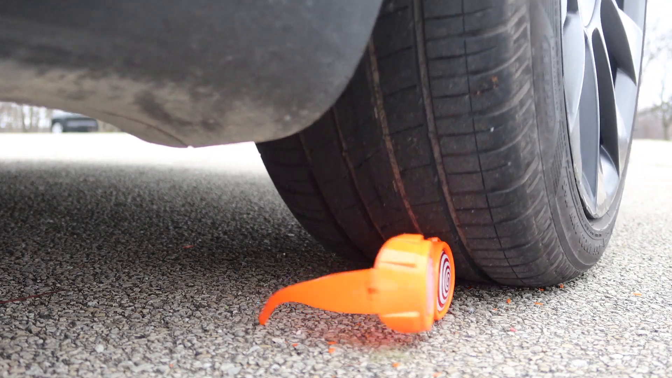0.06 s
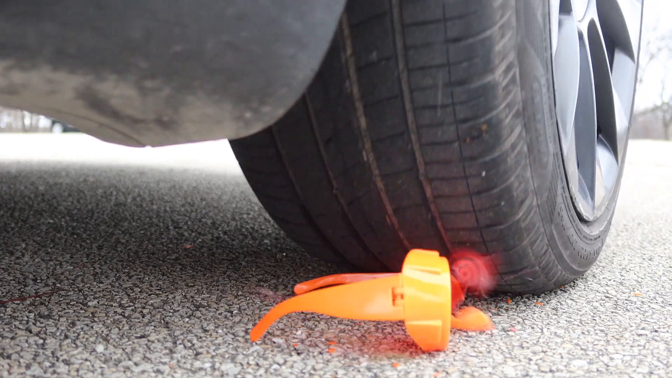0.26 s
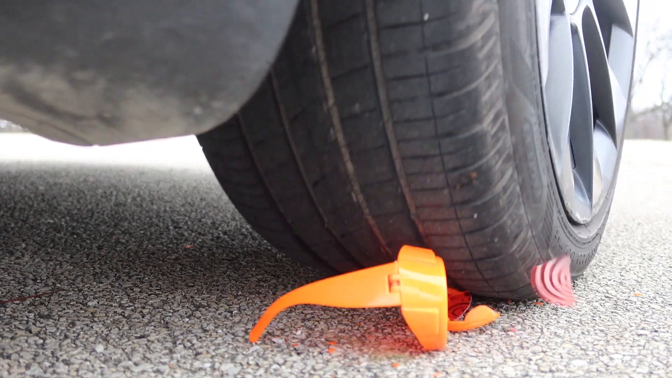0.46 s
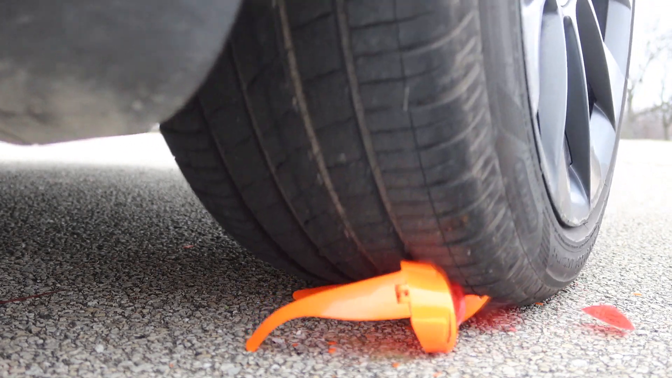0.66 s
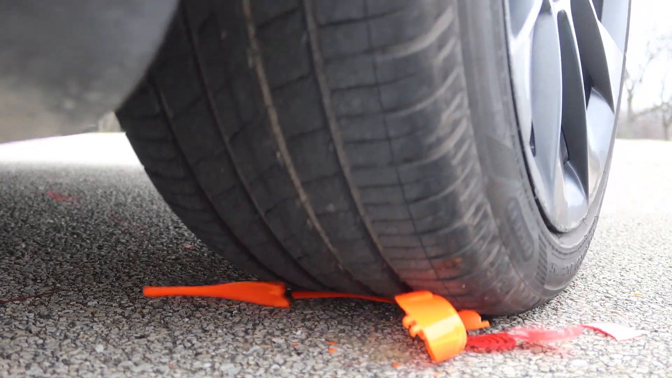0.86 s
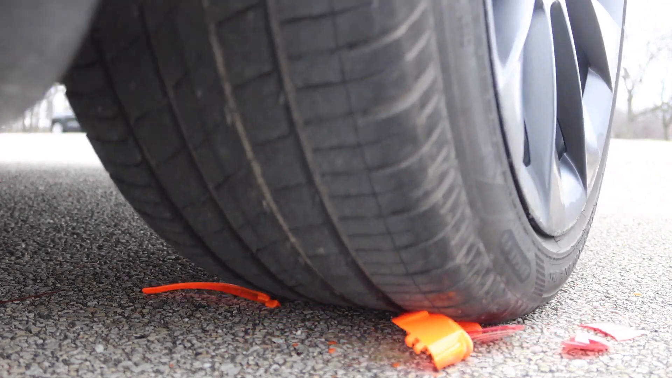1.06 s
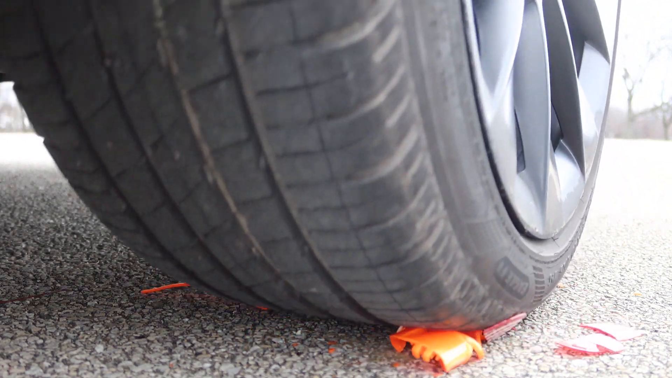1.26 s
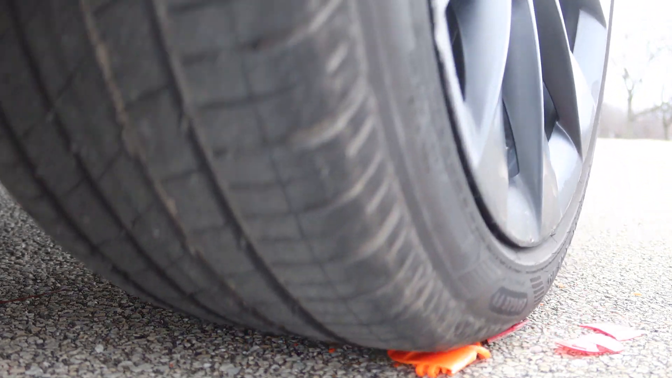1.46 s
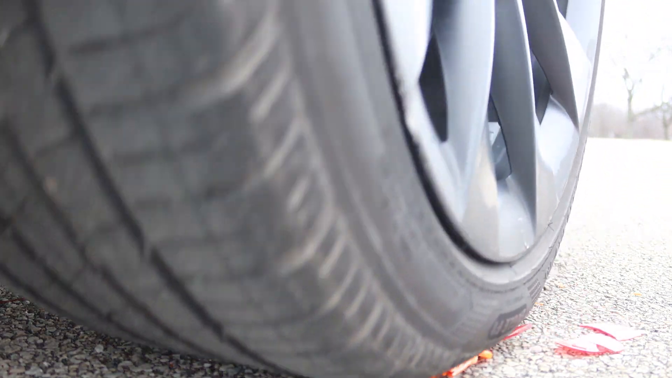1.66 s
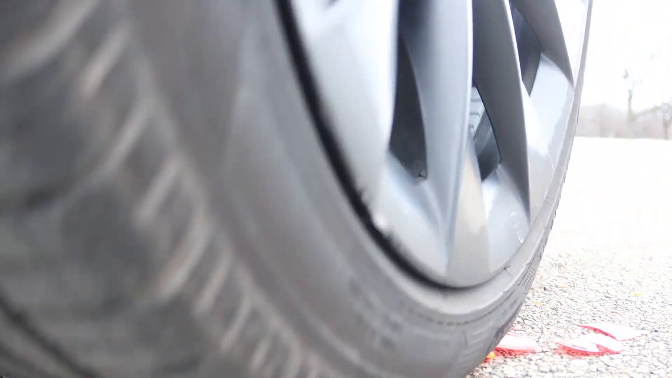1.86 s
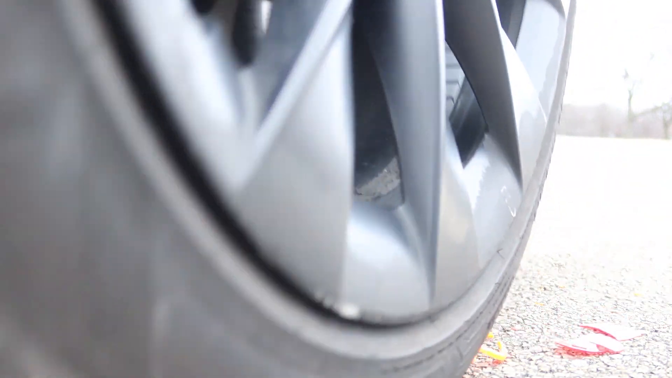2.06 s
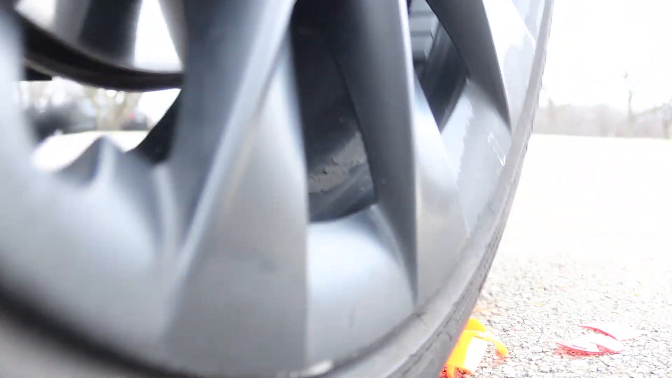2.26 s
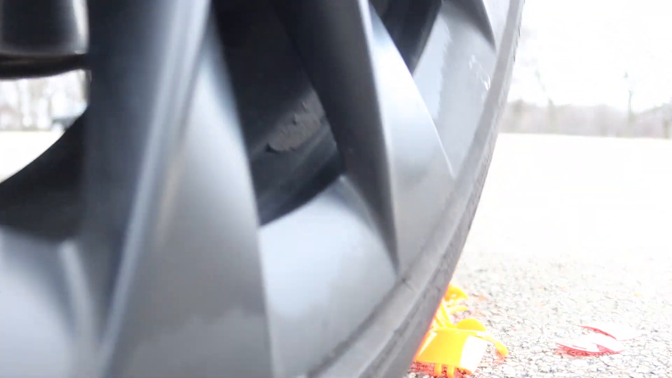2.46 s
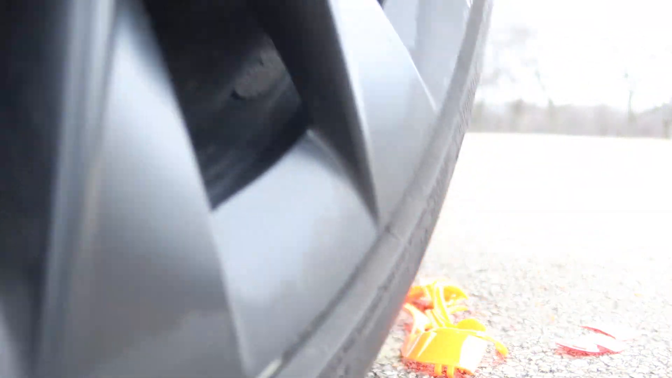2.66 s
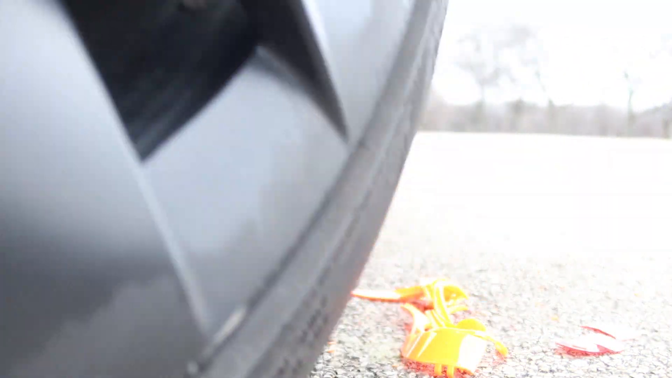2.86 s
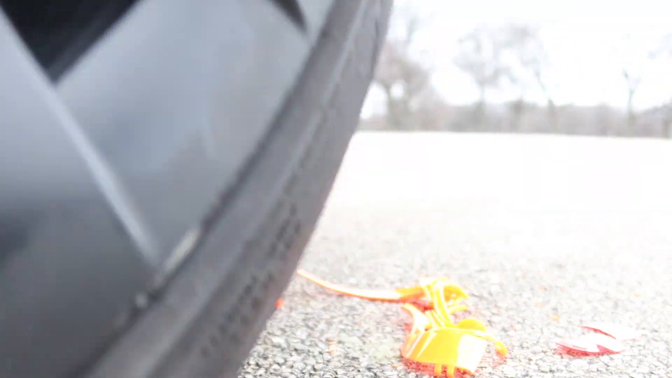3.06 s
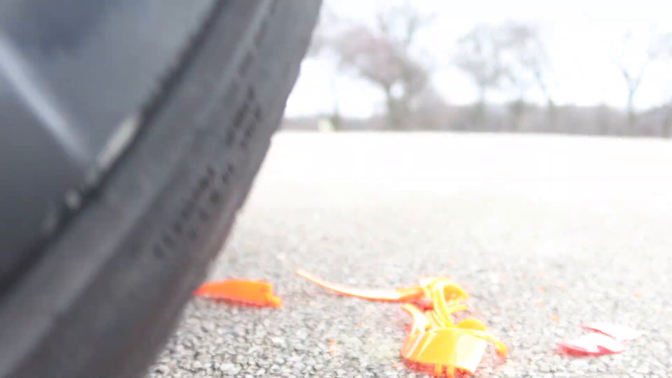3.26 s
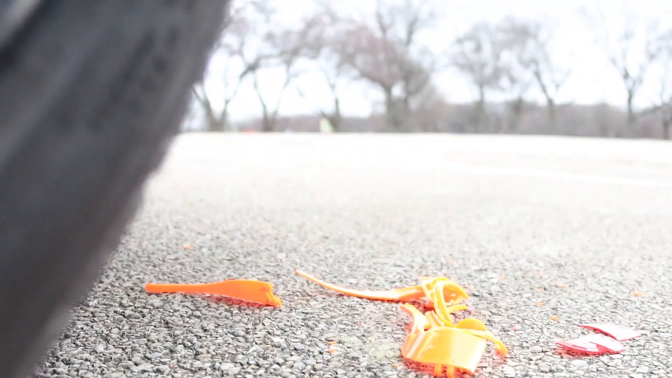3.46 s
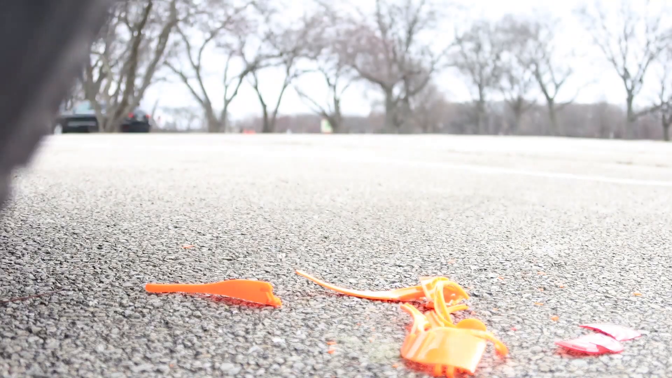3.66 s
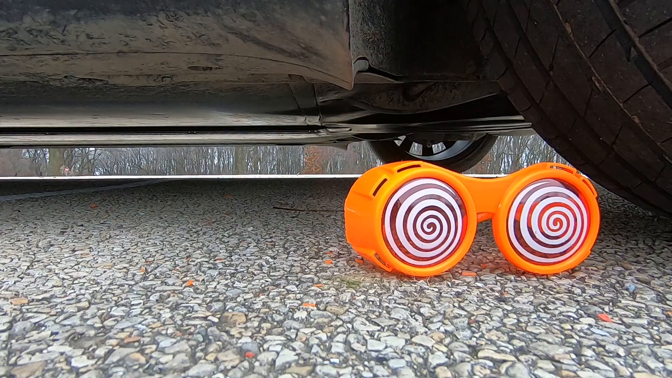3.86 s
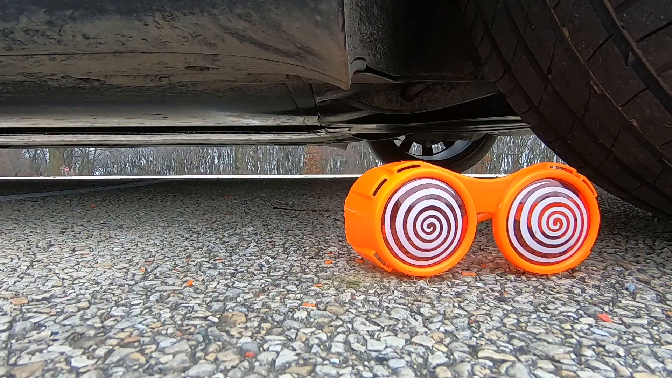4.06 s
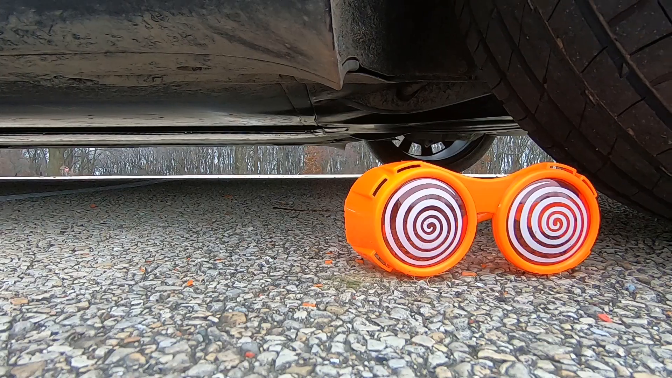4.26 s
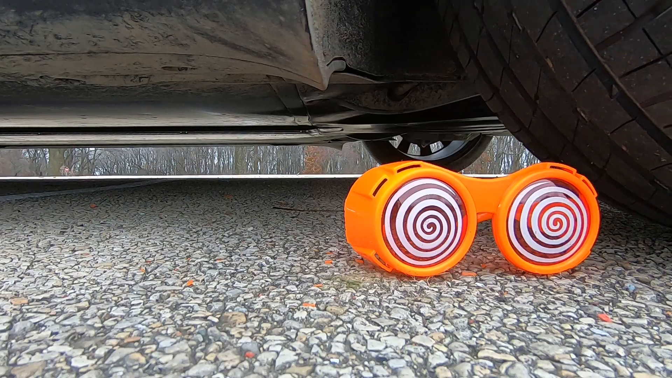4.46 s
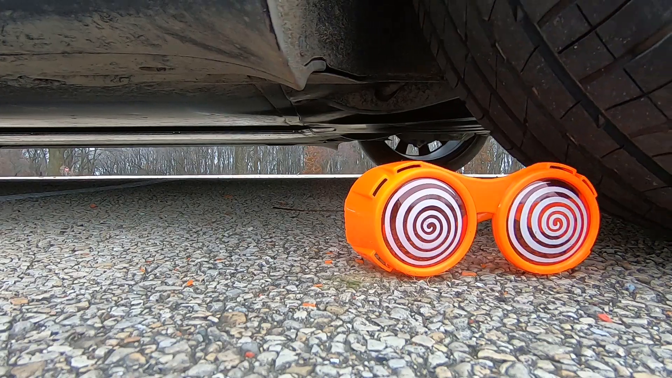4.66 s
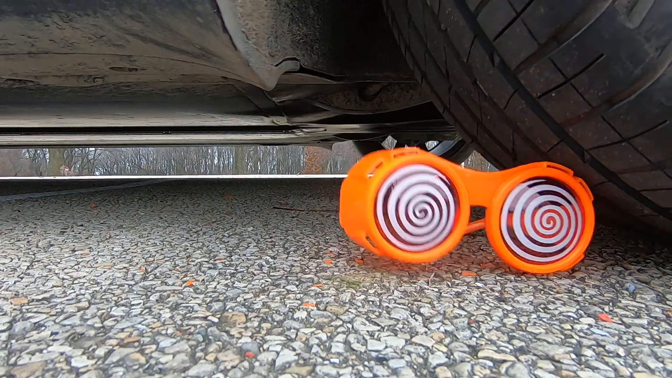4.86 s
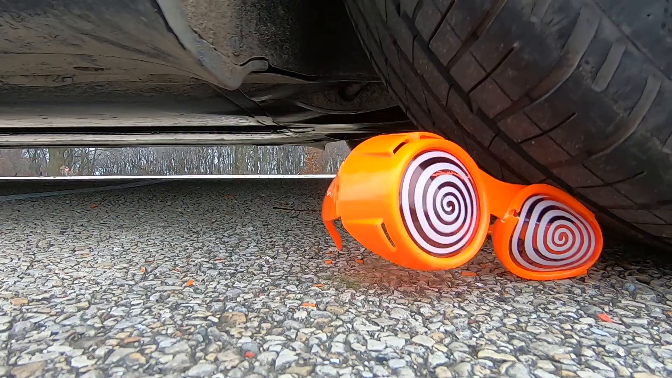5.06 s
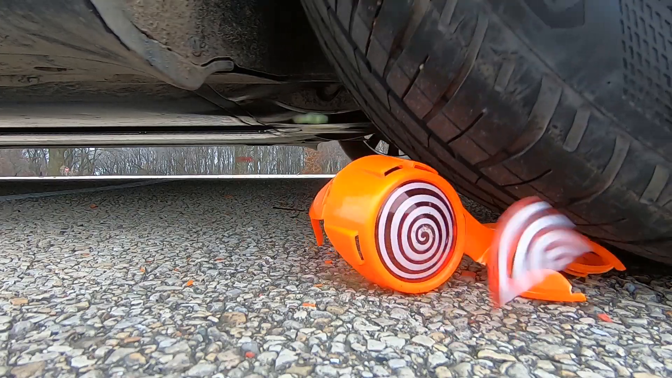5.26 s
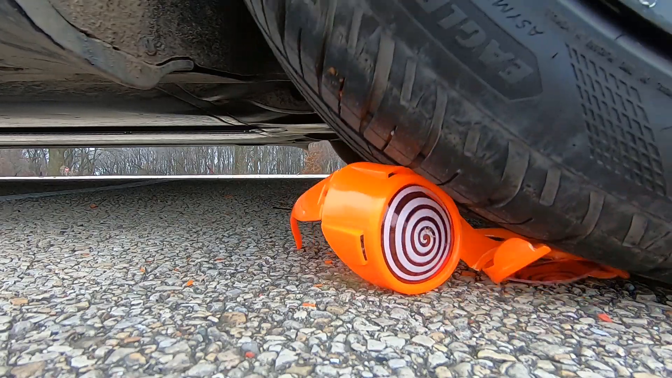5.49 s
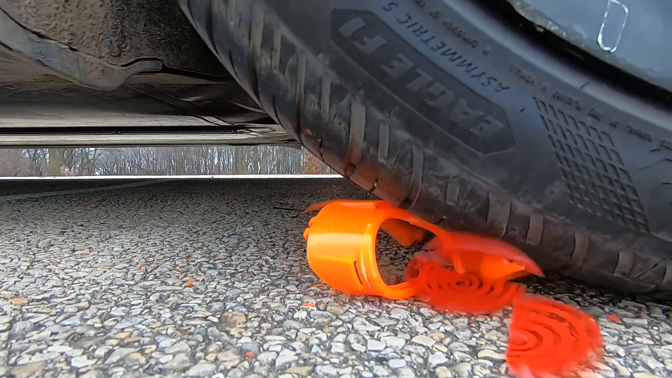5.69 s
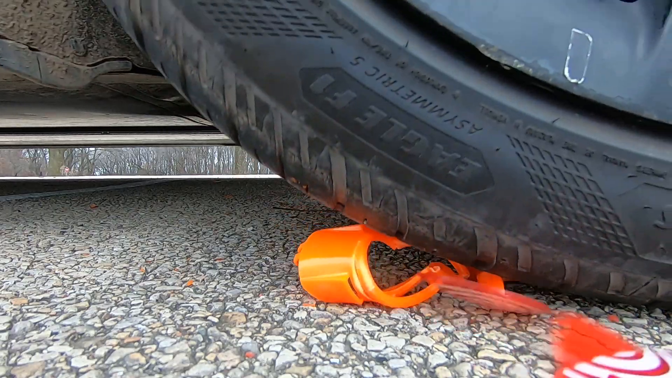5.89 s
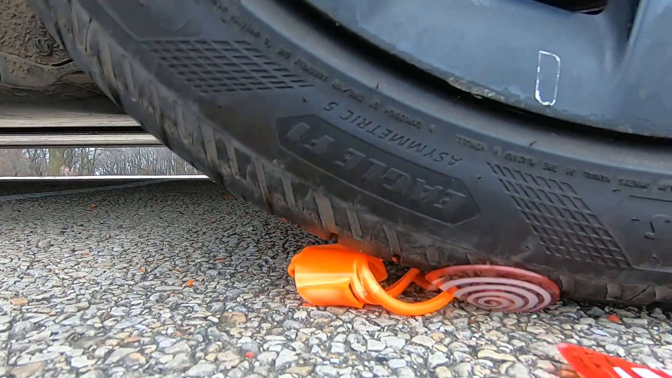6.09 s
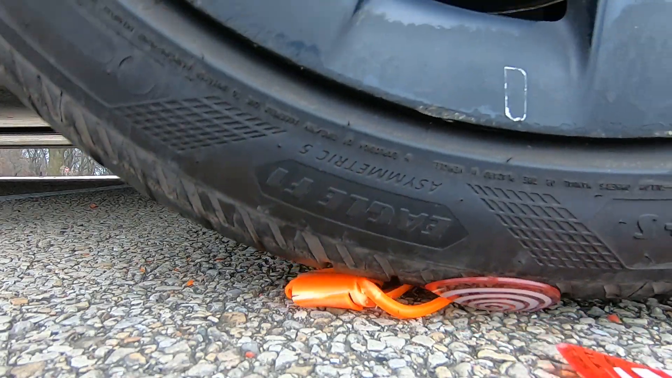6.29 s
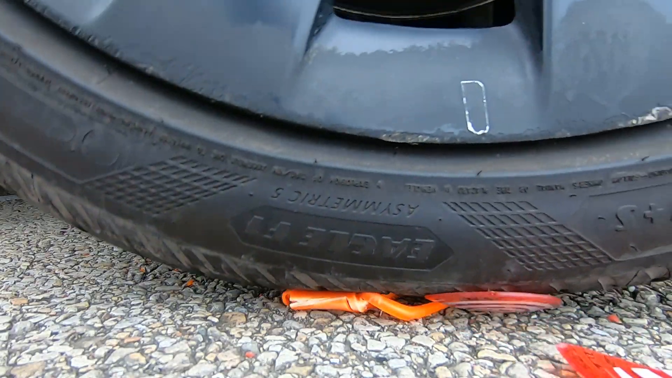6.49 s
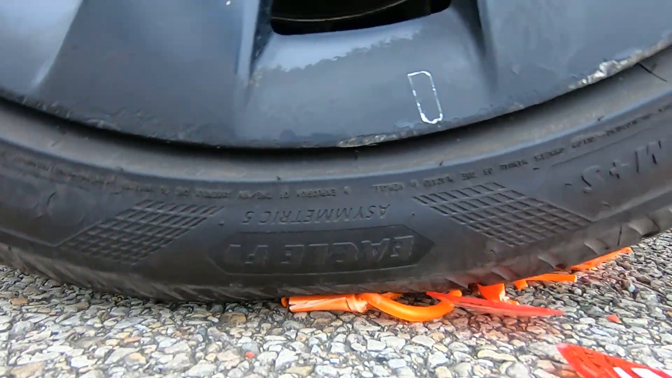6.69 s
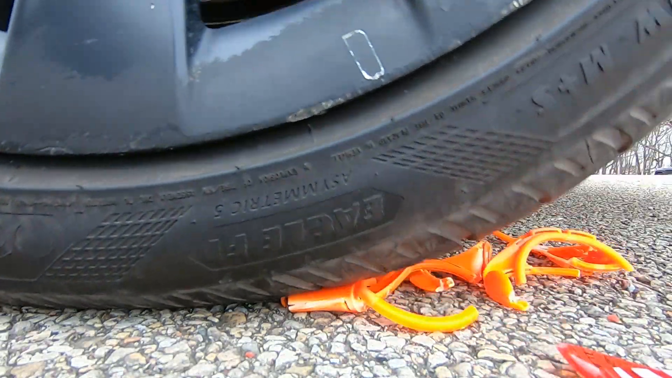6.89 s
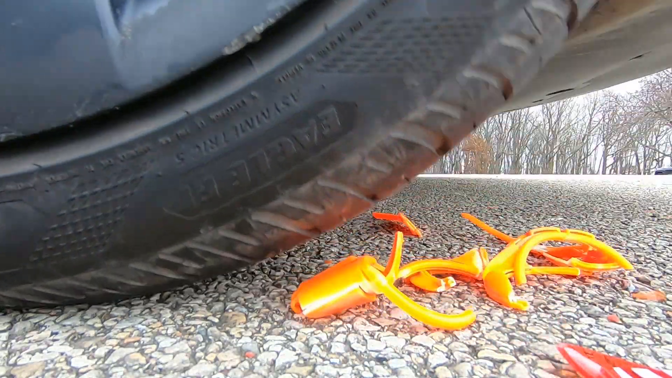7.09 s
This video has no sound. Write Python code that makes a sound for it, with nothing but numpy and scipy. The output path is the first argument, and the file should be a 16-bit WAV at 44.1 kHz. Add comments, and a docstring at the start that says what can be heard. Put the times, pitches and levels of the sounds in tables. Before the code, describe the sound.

A car tyre rolls slowly over hard plastic goggles on asphalt, heard close at ground level. The plastic creaks briefly, then splits in loud volleys of sharp cracks and pops, and shards ping and skitter as the cracking thins out. A second, duller pass follows at once, opening with a low hum, then more creaks, cracks and hollow, booming pops. The tyre rumbles low throughout.

```python
"""On asphalt, at ground level beside the wheel, a car rolls slowly over plastic goggles, twice.
The frame creaks by stick-slip friction, then splits in volleys of sharp cracks. Eyecups buckle with
a pop that sets the air in the tyre booming; shards ping on the metal wheel or skitter over the asphalt.
The tyre rumbles throughout. The first pass is mono, with a faint whine, and overloads; the second is
duller, opens with a low hum and is heard in stereo through two microphone ports."""
import sys
import numpy as np
from scipy import signal
from scipy.fft import rfft, irfft
from scipy.io import wavfile
from scipy.ndimage import uniform_filter1d

SR = 44100
rng = np.random.default_rng(int(sys.argv[2]) if len(sys.argv) > 2 else 0)


def generate_wav(sig):
    """Save sig (samples, or channels by samples) to the path in sys.argv[1] as 16-bit PCM at SR."""
    pcm = np.round(np.clip(np.atleast_2d(sig).T, -1, 1) * 32767).astype(np.int16)
    wavfile.write(sys.argv[1], SR, pcm)


N = 314433
TIME = np.arange(N) / SR
AGE = np.arange(8192) / SR  # seconds since the onset of one event
SECOND_PASS_S = 3.866

# Levels in the tables are relative; each pass adds its own gains.
# main fractures: start_s, level_db, pitch_hz
FRACTURES = [(0.166, 0, 3940), (0.1698, 0, 3246), (0.1985, -1, 3330), (0.2188, -3.5, 3440),
             (0.2416, -4, 3360), (0.2635, 3, 3600), (0.2726, -5.5, 4200), (0.3215, -2, 4430),
             (0.3346, -6, 8160), (0.3537, 3.5, 4400), (0.3644, -7.5, 3880), (0.4663, -0.5, 6134),
             (0.4726, 1, 4420), (0.4924, -2, 8680), (0.5531, -9.5, 2780), (0.6129, 1.5, 3530),
             (0.6518, -6, 2330), (0.6689, 0.5, 3350), (0.6947, -1.5, 3270), (0.7501, -8, 3780),
             (0.7775, 0.5, 3020), (0.848, -7.5, 4120), (0.8659, -5.5, 9200), (0.8754, 1, 3100),
             (0.9737, 4, 2900), (0.9819, -3.5, 3200), (1.0424, -9, 5200), (1.1192, 2.5, 4053),
             (1.1237, 2, 2310), (1.1485, -11, 7910), (1.2292, -4.5, 3220), (1.2395, -3.5, 7700),
             (1.2546, 3.5, 6600), (1.4446, -14, 1536), (1.4516, 0.5, 4320), (1.5085, -10.5, 1690),
             (1.5245, -6.5, 8600), (1.6053, -3, 1550), (1.6101, 0.5, 3830), (1.6707, -9.5, 3500),
             (1.6849, -8.5, 1370), (1.717, -4, 3980), (1.7449, -14.5, 1310), (1.7797, -11.5, 3150),
             (1.7881, 1.5, 2700), (1.8225, -13.5, 2600), (1.8808, -3.5, 3120), (1.9456, -1.5, 3830),
             (2.0251, -1, 9000), (2.1121, -12, 3060), (2.1885, -14, 2580), (2.2114, -6, 3400),
             (2.2856, -14.5, 3590), (5.0141, -12.5, 2640), (5.0446, -14, 2830), (5.0662, -16, 2920),
             (5.088, -18.5, 2830), (5.1085, -9, 1890), (5.1682, -12, 3860), (5.1815, -14, 1750),
             (5.2009, -9, 1740), (5.3156, -15.5, 2600), (5.3379, -15, 2700), (5.3986, -28, 2700),
             (5.462, -16, 1890), (5.5724, -20, 1800), (5.6246, -16.5, 2020), (5.7218, -15, 1820),
             (5.8215, -10, 1770), (5.9744, -10.5, 1800), (6.0756, -27.5, 1840), (6.101, -12.5, 1810),
             (6.2984, -26.5, 5420), (6.355, -39, 7400), (6.373, -38.5, 7700), (6.4546, -15, 5800),
             (6.5314, -21.5, 1670), (6.5645, -22.5, 1760), (6.6347, -15, 1640), (6.7283, -13, 2690),
             (6.7936, -17, 7450), (6.9583, -21, 1770), (7.0361, -23, 1710), (7.0583, -19.5, 5700)]
# how freely the pieces ring as the tyre climbs on to them: time_s, freedom_ratio
PIECE_FREEDOM = [(0.9, 0.59), (1.5, 0.44), (2.2, 0.58), (5.3, 0.96), (6.5, 0.52)]
# treble share of the cracks: time_s, level_db
CRACK_TREBLE = [(0.2, -11), (0.75, -9.5), (1.2, -7), (1.6, -5), (1.76, -19), (1.95, -7.5), (2.15, -18),
                (5.05, -24.5), (5.3, -23), (6.1, -16), (7, -26)]
# spectrum of the plastic in each pass: frequency_hz, gain_db
FIRST_PLASTIC = [(88, -49), (150, -32.5), (190, -13.5), (226, -11), (624, -7.5), (1450, -3.5), (2500, 2),
                 (3490, 5.5), (4950, -0.5), (8730, -8), (10800, -10), (12700, -6.5), (16000, -19.5)]
SECOND_PLASTIC = [(50, -23), (115, -2), (300, 1.5), (1000, -11), (1700, -5), (2300, -7), (2900, 2.5),
                  (3800, -15.5), (4800, -13), (5800, -11.5), (7800, -18.5), (10000, -26), (12500, -36.5),
                  (16000, -54)]
# the frame rubbing on the tread, and one very short snap at 0.73 s played the same way: start_s, level_db,
# length_s
FRAME_CREAKS = [(0.079, 4, 0.03), (0.1, 2.5, 0.018), (0.121, -1, 0.017), (0.6167, 1, 0.027),
                (0.638, -13, 0.0051), (0.7265, -2.5, 0.0028), (1.111, -10, 0.022), (2.226, -12.5, 0.029),
                (4.922, -29.5, 0.019), (4.941, -23.5, 0.036), (5.485, -24, 0.028), (5.514, -23, 0.019),
                (5.54, -22, 0.015)]
# eyecups collapsing: start_s, level_db, pitch_hz
EYECUP_POPS = [(0.262, -14, 325), (0.7335, 4, 677), (0.974, -15, 513), (1.041, -8.5, 635),
               (1.123, -17, 695), (1.61, -11.5, 753), (5.1085, -5.5, 218), (5.168, -9.5, 195),
               (5.2, -16.5, 303), (5.5803, -1.5, 600), (5.626, -7.5, 235), (5.723, -8.5, 247),
               (5.822, -9.5, 345), (5.889, -16.5, 610), (5.974, -10, 546), (6.101, -21, 270),
               (6.458, -8, 392), (6.635, -18, 648), (6.793, -17, 498), (7.036, -21.5, 370)]
# shards pinging on the wheel or skittering over the asphalt: start_s, level_db, contact_s, pitch_hz
SHARD_CONTACTS = [(0.885, -8, 0.057, 4700), (1.02, -14.5, 0.042, 4700), (1.058, -11, 0.017, 5550),
                  (1.987, -11, 0.046, 4500), (2.026, 2.5, 0.0011, 4360), (2.501, -3, 0.003, 4360),
                  (2.509, 2, 0.0094, 4360), (2.549, -17.5, 0.0011, 6800), (2.698, -18, 0.0049, 4660),
                  (2.798, -16, 0.019, 4500), (2.843, -21, 0.0021, 4360), (2.943, -8, 0.00066, 4360),
                  (2.951, -7.5, 0.0016, 4360), (3.029, -10, 0.00078, 4360), (3.058, -18.5, 0.0081, 4360),
                  (5.735, -34, 0.037, 4700), (5.86, -36.5, 0.036, 4700), (6.873, -16.5, 0.0017, 5700)]
# modes of the wheel and of the air in the tyre: frequency_hz, level_db, t60_s
WHEEL_MODES = [(998, -22.5, 0.44), (2478, -12, 0.18), (2405, -23, 0.13), (3856, 0.5, 0.048),
               (4356, -0.5, 0.057), (4610, 0, 0.11), (4820, -14, 0.12), (5550, -16, 0.099),
               (5676, -17, 0.13), (6300, -8, 0.049), (8090, -9, 0.043), (8700, -13.5, 0.07),
               (11400, -21, 0.06), (12500, -21, .05)]
CAVITY_MODES = [(112, 1.5, 0.077), (139, -7.5, 0.28), (196.8, -0.5, 1), (265, -9, 0.2), (332, 6, 0.09),
                (377.2, -1, 0.45)]
# rolling noise, one list per pass: time_s, rumble_db, roar_db
ROLL_LEVELS = [
    [(0, -31, -33), (0.13, -32, -27.5), (0.3, -50, -46.5), (0.75, -46, -34.5), (1.15, -49.5, -39.5),
     (1.45, -50, -32.5), (1.95, -39.5, -34.5), (2.2, -35.5, -37), (2.7, -39.5, -40.5), (3.3, -38, -38),
     (3.86, -27, -36)],
    [(3.87, -30, -35.5), (4.7, -30.5, -36), (5, -31.5, -35.5), (5.35, -38, -44.5), (5.8, -43, -40),
     (6.25, -44.5, -46), (6.65, -44.5, -37.5), (7.13, -37.5, -40)],
]
# its spectrum in each pass: frequency_hz, gain_db
FIRST_ROLL = [(12, -41.5), (20, 1), (86, 2.5), (222, -18.5), (310, -25.5), (337, -22.5), (513, -24),
              (558, -15.5), (642, -22), (949, -18), (1760, -33.5), (4180, -32), (4810, -41.5),
              (9670, -52.5), (16000, -62)]
SECOND_ROLL = [(12, -60.5), (20, -23.5), (59, 4), (106, -3.5), (143, 0), (248, -8), (351, -6), (463, -19),
               (570, -10.5), (905, -15.5), (1250, -22), (1690, -24), (2330, -47), (5000, -60.5),
               (6500, -117), (11000, -120)]
# hum of the car: time_s, pitch_hz, fundamental_db, octave_db
CAR_HUM = [(3.87, 69.4, -42.5, -32), (4.3, 68.55, -37.5, -32.5), (4.75, 69.3, -36.5, -41.5),
           (5.001, 67.2, -29.5, -55), (5.15, 66, -36.5, -27.5)]
# phase between the ports: frequency_hz, left_lead_rad
PORT_LEAD = [(330, 0), (550, .45), (1000, 1.7), (1400, 2.2), (1850, 1.6), (2500, 3), (3000, 4.1),
             (6500, 4.3), (8300, 7), (12000, 6.5)]
# shading of the ports by their housing: frequency_hz, left_minus_right_db
PORT_SHADE = [(200, 0), (700, -4), (1300, 4), (2400, 1), (4000, 4), (4500, -1), (5600, 7), (7700, -5),
              (9300, 5), (12000, 0)]


def crack(s, db, hz, snap_t60=0.0091, body_t60=0.044, mode_t60=0.053, echo_t60=0.15, rise_s=0.00018):
    """Brittle fracture: a snap excites the piece's modes, and the gap under the car echoes briefly."""
    free = np.interp(s, *np.transpose(PIECE_FREEDOM))  # pieces pinned under the rubber die quickly
    noise = rng.standard_normal(len(AGE))
    envelope = amp(4) * decay(snap_t60) + free * decay(body_t60 * free) + amp(-27) * decay(echo_t60)
    modes = [(2200 + 12500 * place ** 1.3, size, turn) for place, size, turn in rng.random((26, 3))]
    ringing = sum(size ** 3 * ring(f, mode_t60 * np.sqrt(hz / f), turn) for f, size, turn in modes)
    burst = noise * envelope + amp(-10) * free * unit_peak(ringing)
    burst *= 1 - np.exp(-AGE / rise_s)  # a very short rise softens the attack
    f = freqs(AGE)
    gain = plastic_gain(s, f) * (1 + amp(7) * resonance(f, hz, width_hz=230))
    gain *= piece_tilt(abs(rfft(burst) * gain) ** 2, s, hz, free)
    return amp(db) * unit_peak(coloured(burst, gain))


def piece_tilt(power, s, hz, free, frame_hz=3400):
    """Size sets bandwidth: large or pinned pieces radiate more bass, small ones gain the most treble."""
    f = freqs(AGE)
    octaves = np.log2(hz / frame_hz)
    large, small = max(-octaves, 0), max(octaves, 0)
    bass_db = -20.5 + 21.5 * (1 - free) + 11 * large
    treble_db = np.interp(s, *np.transpose(CRACK_TREBLE)) + 4 + 3 * large + 9.5 * small

    def share_db(low_hz, high_hz):
        return 10 * np.log10(power[(f > low_hz) & (f < high_hz)].sum() / power[f > 1000].sum())

    tilt = [(1100, bass_db - share_db(500, 1500)), (2000, 0.042),
            (4500, 0.00068), (7000, treble_db - share_db(6000, 16000))]
    return amp(curve(tilt, f))


def splinters(cracks, s, reach_s=0.007, per_s=320, spread_db=4, t60=0.003):
    """Acoustic emission: tiny random fractures cluster just before and after each big one."""
    window = np.exp(-abs(np.r_[-AGE[:0:-1], AGE]) / reach_s)
    strain = np.sqrt(abs(signal.fftconvolve(cracks ** 2, window / window.sum(), "same")))
    clicks = (rng.random(N) < per_s / SR) * amp(spread_db * np.minimum(rng.exponential(1, N), 3))
    envelope = np.sqrt(abs(signal.fftconvolve(clicks ** 2, decay(t60) ** 2)[:N]))
    grains = envelope * rng.standard_normal(N)
    f = freqs(TIME)
    gain = plastic_gain(s, f) * f ** 2 / (f ** 2 + 1200 ** 2)
    return strain * unit_rms(irfft(rfft(grains) * gain, N))


def creak(s, db, hz, length_s, hollow_db, slips_per_s=1500, t60=0.017, grit_hz=6000):
    """Stick-slip friction: a quick run of uneven slips drives two resonances of the frame."""
    stroke = (AGE / length_s) * np.exp(-(1.5 * AGE / length_s) ** 2)
    slips = stroke * rng.standard_normal(len(AGE))
    slips *= 0.15 + (rng.random(len(AGE)) < slips_per_s / SR)
    frame = ring(hz, t60) + amp(hollow_db) * ring(0.58 * hz, t60)
    body = signal.fftconvolve(slips, frame)[:len(AGE)]
    f = freqs(AGE)
    grit = coloured(slips, plastic_gain(s, f) / (1 + (f / grit_hz) ** 2))
    return amp(db) * unit_peak(unit_peak(body) + amp(-6) * unit_peak(grit))


def pop(db, hz, rise_cycles=0.55, cavity_hz=216):
    """Buckling: an eyecup caves in with a puff; near cavity_hz the tyre's air booms in sympathy."""
    rise = AGE * hz / rise_cycles
    puff = rise * np.exp(-rise) * np.sin(2 * np.pi * hz * AGE)
    boom = sum(amp(level) * ring(f, t60) for f, level, t60 in CAVITY_MODES)
    boom *= 1 - (AGE / AGE[-1]) ** 2
    boom_db = -17 + 28 * resonance(hz, cavity_hz, width_hz=110)
    pressure = unit_peak(puff) + amp(boom_db) * unit_peak(boom)
    low_cut = signal.butter(2, 60, "high", fs=SR)  # the pop carries no deep bass
    return amp(db) * unit_peak(signal.lfilter(*low_cut, pressure))


def ping(s, db, contact_s, pitch_hz, taps_per_s=250, uneven_db=6, shard_t60=0.028, skid_s=0.042):
    """Impact excitation: a shard pings on the wheel or skitters over the asphalt with a bright ring."""
    contact = np.exp(-AGE / contact_s)
    force = rng.standard_normal(len(AGE)) * contact
    force *= 1 + amp(22) * (rng.random(len(AGE)) < taps_per_s / SR)  # it chatters as it slides
    force[0] += 8  # the first touch
    modes = np.zeros(len(AGE))
    for hz, level, t60 in WHEEL_MODES:
        mode_db = level + 6 * resonance(hz, pitch_hz, width_hz=200) + uneven_db * rng.standard_normal()
        modes += amp(mode_db) * ring(hz, t60, rng.random())
    ringing = signal.fftconvolve(force, modes)[:len(AGE)]
    clatter = rng.standard_normal(len(AGE)) * (contact + decay(shard_t60))
    f = freqs(AGE)
    skid = min(contact_s / skid_s, 1)  # a long contact hisses, a short one knocks
    high_pass = f ** 2 / (f ** 2 + (2200 + 4000 * skid) ** 2)
    low_pass = 1 / (1 + (f / (10000 * (1 + skid / 2))) ** 4)
    shard = coloured(clatter, plastic_gain(s, f) * high_pass * low_pass)
    return amp(db) * unit_peak(unit_peak(ringing) + amp(-2) * unit_peak(shard))


def goggles(start_s, end_s, crack_db, splinter_db, creak_db, pop_db, ping_db, frame_hz, hollow_db):
    """Superposition: the sounds of the goggles being crushed in one pass add linearly."""
    def during(table):
        return [row for row in table if start_s <= row[0] < end_s]

    mix = np.zeros(N)
    for s, db, hz in during(FRACTURES):
        add(mix, s, crack(s, db + crack_db, hz))
        chance, wait, piece = rng.random(3)
        run_on = crack(s, db + crack_db - 7.5, hz * 2 ** (0.3 * (2 * piece - 1)))
        if chance < 0.34:  # a fracture may run on in a weaker step
            add(mix, s + 0.012 * (0.5 + wait), run_on)
    mix += amp(splinter_db) * splinters(mix, start_s)
    for s, db, length_s in during(FRAME_CREAKS):
        hz = frame_hz * 2 ** rng.uniform(-0.08, 0.08)
        add(mix, s, creak(s, db + creak_db, hz, length_s, hollow_db))
    for s, db, hz in during(EYECUP_POPS):
        add(mix, s, pop(db + pop_db, hz))
    for s, db, contact_s, hz in during(SHARD_CONTACTS):
        add(mix, s, ping(s, db + ping_db, contact_s, hz))
    return mix


def rolling(levels, colour, rumble_db, roar_db, split_hz=180):
    """Roughness excitation: asphalt shakes the tyre into a deep rumble and a roar of the tread."""
    s, rumble, roar = np.transpose(levels)
    f = freqs(TIME)
    spectrum = rfft(rng.standard_normal(N)) * amp(curve(colour, f))
    low_pass = 1 / (1 + (f / split_hz) ** 4)
    bands = (low_pass, rumble + rumble_db), (1 - low_pass, roar + roar_db)
    return sum(unit_rms(irfft(spectrum * band, N)) * amp(np.interp(TIME, s, db)) for band, db in bands)


def hum(gain_db=-1, fade_s=0.075):
    """Harmonic vibration: the car hums on a drifting fundamental and its octave, then fades."""
    s, *columns = np.transpose(CAR_HUM)
    hz, fundamental_db, octave_db = (np.interp(TIME, s, column) for column in columns)
    phase = 2 * np.pi * np.cumsum(hz) / SR
    tone = amp(fundamental_db) * np.sin(phase) + amp(octave_db) * np.sin(2 * phase)
    fade = np.exp(-np.maximum(TIME - s[-1], 0) / fade_s)
    return amp(gain_db) * np.sqrt(2) * fade * tone


def whine(hz=9550, rms_db=-72):
    """A pure tone, heard as a faint, steady whine."""
    return amp(rms_db) * np.sqrt(2) * np.sin(2 * np.pi * hz * TIME)


def ports(x, mesh_hz=13200):
    """Acoustic shadowing: the housing shades each port, the left leads, and their mesh dulls the top."""
    f = freqs(TIME)
    lead = np.interp(f, *np.transpose(PORT_LEAD))
    left = amp(curve(PORT_SHADE, f) / 2) * np.exp(0.5j * lead)
    mesh = 1 / np.sqrt(1 + (f / mesh_hz) ** 24)
    return irfft(rfft(x) * mesh * np.array([left, 1 / left]), N)


def plastic_gain(s, f):
    """Frequency response of the goggles in the pass under way at s seconds."""
    return amp(curve(FIRST_PLASTIC if s < SECOND_PASS_S else SECOND_PLASTIC, f))


def resonance(f, centre_hz, width_hz):
    """Lorentzian peak, falling to one half at width_hz from its centre."""
    return 1 / (1 + ((f - centre_hz) / width_hz) ** 2)


def ring(hz, t60, turn=0):
    """One damped mode, with its starting phase in turns."""
    return np.sin(2 * np.pi * (hz * AGE + turn)) * decay(t60)


def decay(t60):
    """Exponential decay by 60 dB in t60 seconds."""
    return np.exp(-np.log(1000) * AGE / max(t60, 1e-4))


def coloured(x, gain):
    """Minimum-phase filter with the given relative gain in each bin."""
    log_gain = np.log(np.maximum(gain / gain.max(), 1e-5))
    mirrored = np.r_[log_gain, log_gain[-2:0:-1]]
    return irfft(rfft(x) * np.exp(np.conj(signal.hilbert(mirrored)))[:len(gain)])


def curve(points, hz):
    """Interpolation on a log-frequency axis."""
    f, value = np.transpose(points)
    return np.interp(np.log(hz + 1), np.log(f + 1), value)


def freqs(x):
    """Bin frequencies of a signal as long as x."""
    return np.fft.rfftfreq(len(x), 1 / SR)


def amp(db):
    """Decibels to gain."""
    return 10 ** (np.asarray(db) / 20)


def unit_rms(x):
    """Scales to an rms of one."""
    return x / np.sqrt(np.mean(x ** 2) + 1e-20)


def unit_peak(x):
    """Scales the loudest two milliseconds to an rms of one."""
    return x / np.sqrt(uniform_filter1d(x ** 2, 88).max() + 1e-20)


def add(mix, s, sound):
    """Mixes a sound in at s seconds."""
    part = mix[max(round(s * SR), 0):][:len(sound)]
    part += sound[:len(part)]


def scene():
    """Two passes of the wheel, one straight after the other, each the sum of its sources."""
    first = goggles(0, SECOND_PASS_S, crack_db=-4, splinter_db=-16, creak_db=-11,
                    pop_db=-5, ping_db=-10.5, frame_hz=3320, hollow_db=-19)
    first += rolling(ROLL_LEVELS[0], FIRST_ROLL, rumble_db=-1.5, roar_db=-3) + whine()
    second = goggles(SECOND_PASS_S, N / SR, crack_db=-1, splinter_db=-15, creak_db=4.5,
                     pop_db=-3, ping_db=1.5, frame_hz=2910, hollow_db=0)
    second += rolling(ROLL_LEVELS[1], SECOND_ROLL, rumble_db=-2, roar_db=-0.5) + hum()
    return np.where(TIME < SECOND_PASS_S, first, ports(second))


def record(dry, cutoff_hz=16300):
    """Overload: the loudest cracks clip at full scale, then a low-pass filter limits the band."""
    low_pass = signal.firwin(255, cutoff_hz, window=("kaiser", 8), fs=SR)
    return signal.oaconvolve(np.clip(dry, -1, 1), low_pass[None], "same")


dry = scene()
out = record(dry)
generate_wav(out)
```